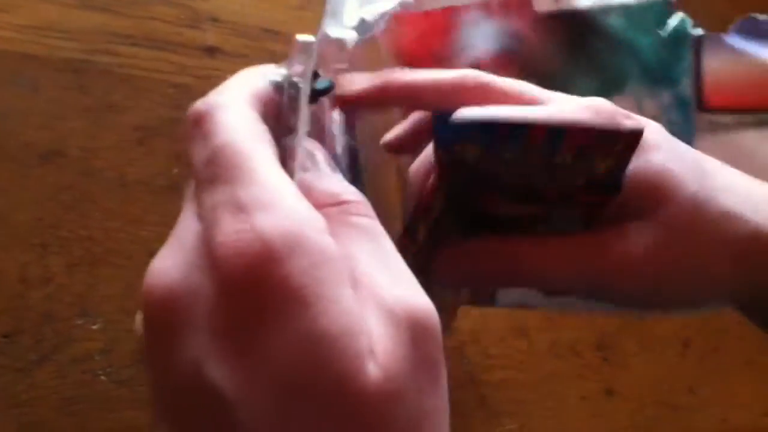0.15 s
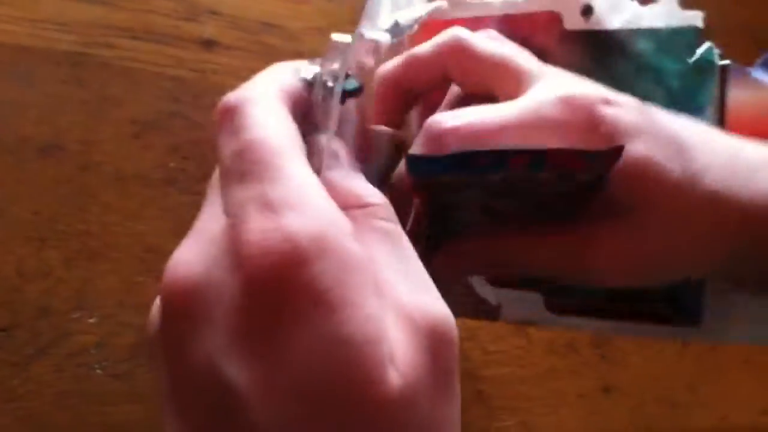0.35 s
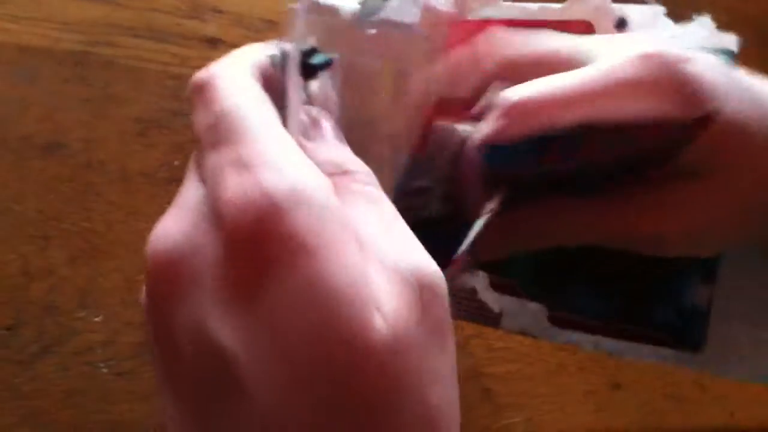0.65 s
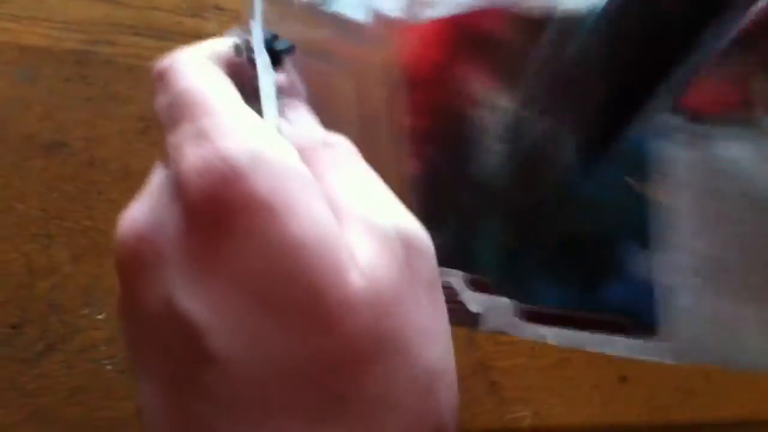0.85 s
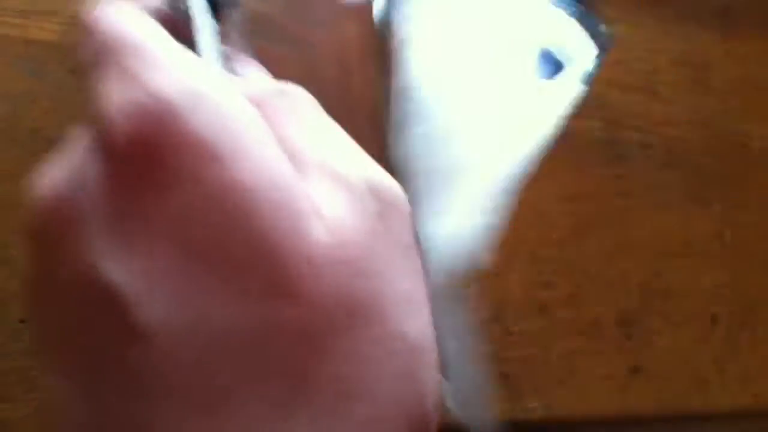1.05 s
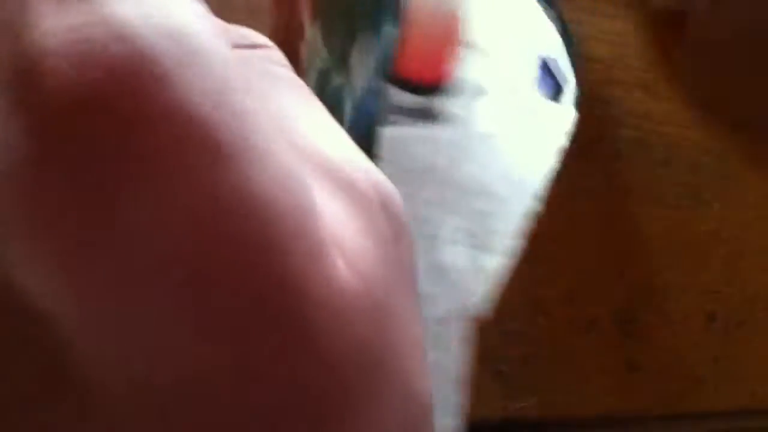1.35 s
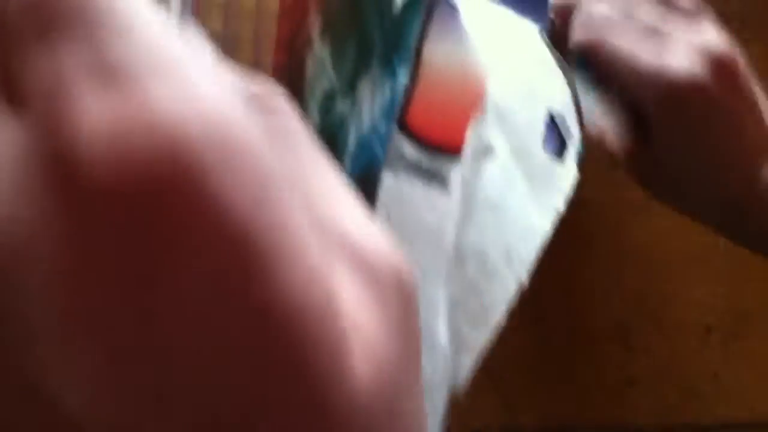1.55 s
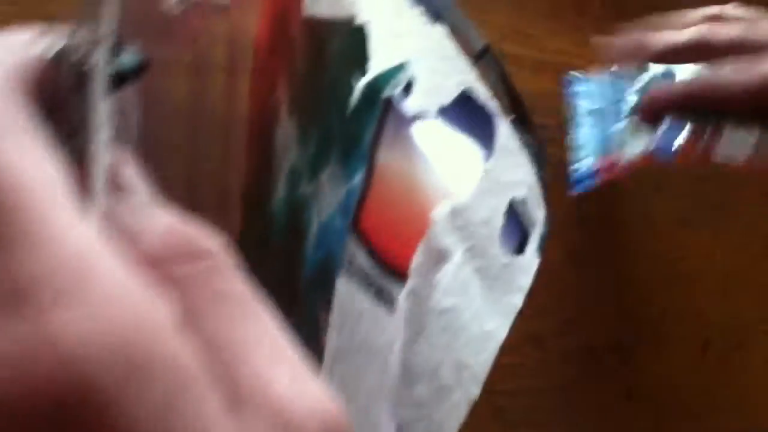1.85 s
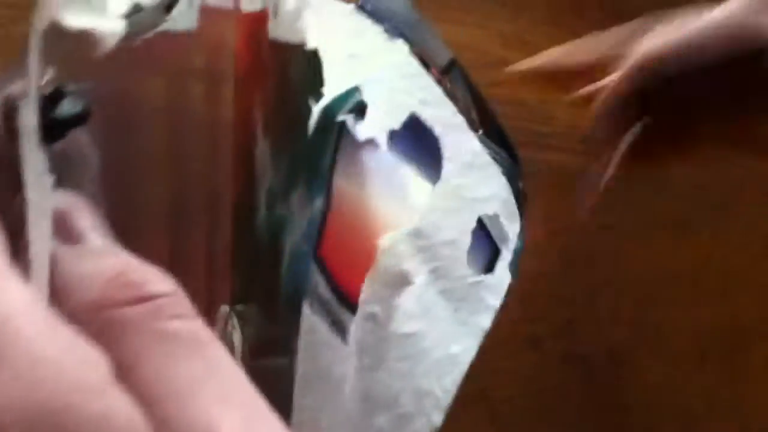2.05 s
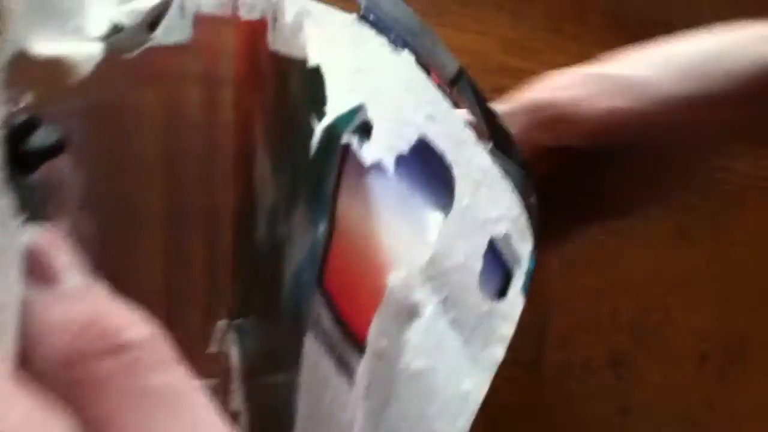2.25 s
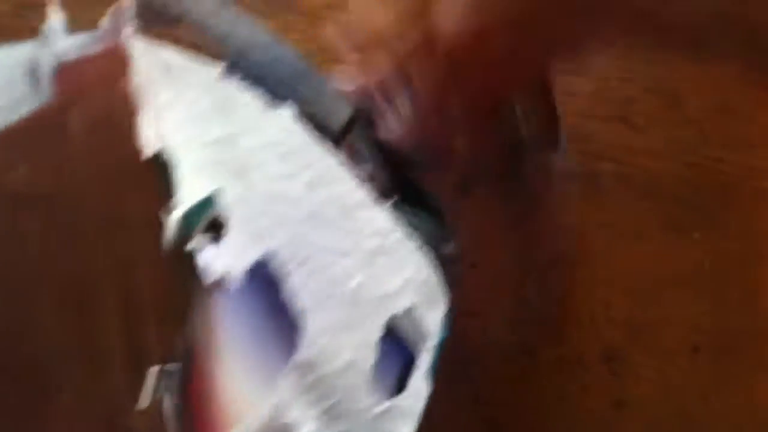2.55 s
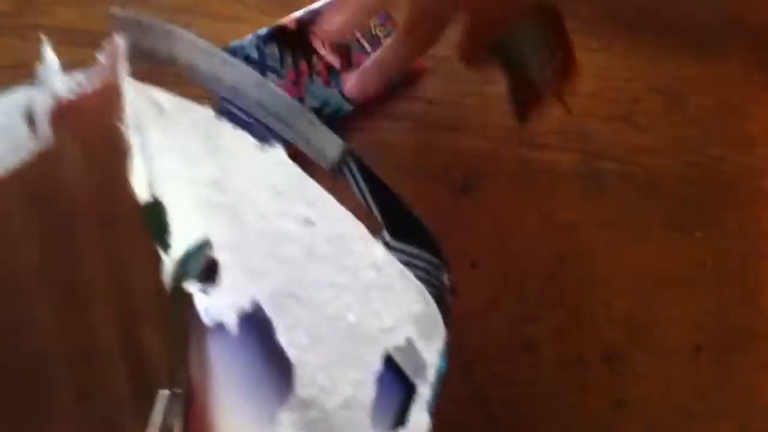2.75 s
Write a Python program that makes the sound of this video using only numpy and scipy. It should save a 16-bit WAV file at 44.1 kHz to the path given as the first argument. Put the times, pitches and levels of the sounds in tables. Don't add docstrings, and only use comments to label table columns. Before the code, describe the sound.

Stiff plastic packaging crackles and snaps sharply as hands peel it from card, then lighter foil packets rustle and scrape, one dropping with a soft thud on a wooden table; small room, close microphone.

```python
import sys
import numpy as np
from scipy import signal
from scipy.fft import rfft, irfft, next_fast_len
from scipy.io import wavfile
from scipy.ndimage import uniform_filter1d, map_coordinates

SR = 44100
rng = np.random.default_rng(int(sys.argv[2]) if len(sys.argv) > 2 else 0)


def how_loud(loudness_db):
    steps = np.asarray(loudness_db, float) / 20
    return 10 ** steps


def transcribe(signal):
    frames = np.atleast_2d(signal).T
    limited = np.clip(frames, -1, 1)
    pcm = np.round(limited * 32767).astype(np.int16)
    wavfile.write(sys.argv[1], SR, pcm)


N = 127890


def unit(x):
    return x / np.sqrt(np.mean(x ** 2) + 1e-20)


def along(points, hz):
    point_hz, value = np.transpose(points)
    return np.interp(np.log(hz + 1), np.log(point_hz + 1), value)


def wobble(rate):
    knots = rng.standard_normal(int(N * rate / SR) + 4)
    return map_coordinates(knots, [np.arange(N) * rate / SR])


def filtered(x, response):
    m = next_fast_len(N + SR // 2)
    return irfft(rfft(x, m) * response(np.fft.rfftfreq(m, 1 / SR)), m)[:N]


def add(out, s, sound):
    part = out[round(s * SR):][:len(sound)]
    part += sound[:len(part)]


def burst(hz, spread, t60, rise_s, t):
    f = np.fft.rfftfreq(len(t), 1 / SR) + 1
    band = (1 + (np.log(f / hz) / spread) ** 2) ** 1.08
    noise = irfft(rfft(rng.standard_normal(len(t))) / band, len(t))
    noise = noise * how_loud(-60 * t / t60) * (1 - np.exp(-t / rise_s))
    return noise / np.linalg.norm(noise) * np.sqrt(SR / 1000)


def snaps():
    # start_s, level_db, pitch_hz, card_db (card body over bright part)
    peel = [(0.0436, -39, 5200, 61), (0.062, -32, 5570, -26.5), (0.1023, -29.5, 7500, -19),
            (0.164, -47, 5400, 22), (0.1747, -27, 4540, -32), (0.1858, -29.5, 5100, 1),
            (0.2077, -16.5, 5200, -12), (0.2141, -18, 5440, -14), (0.2242, -12.5, 7700, -13),
            (0.2275, -5.5, 9250, -14.5), (0.2703, -34, 5900, 19), (0.3103, -18.5, 4840, -30),
            (0.3159, -10.5, 6400, -18.5), (0.325, -35, 6000, -26), (0.328, -28, 5700, -17),
            (0.3339, -24.5, 6100, -38), (0.369, -21.5, 6440, -8.5), (0.3954, -23, 6900, -16),
            (0.4021, -10.5, 7700, -12), (0.421, -22.5, 4850, -25), (0.4263, -24.5, 7160, -36),
            (0.4542, -23.5, 5700, -11), (0.4828, -31, 7900, -12), (0.508, -34, 7700, 4),
            (0.5496, -28, 6600, 0)]
    # start_s, level_db, pitch_hz, card_db
    pull = [(0.5782, -15, 7060, -11), (0.6024, -23, 7400, -22), (0.6151, -33, 4700, 14),
            (0.6645, -19, 7400, -6.5), (0.6726, -21.5, 6960, -7), (0.704, -16.5, 5400, -6.5),
            (0.722, -16, 8650, -18), (0.7318, -28, 6400, -19), (0.766, -28.5, 6300, 2),
            (0.7779, -15.5, 8000, -15.5), (0.8747, -26.5, 4300, 3), (0.8814, -25, 4000, 5),
            (0.8924, -15.5, 6200, -7), (0.8966, -16, 7340, -20), (0.9296, -14, 7700, -43),
            (0.94, -47, 6300, 5), (1.0438, -39.5, 6500, 7), (1.0856, -28, 6100, -12),
            (1.101, -38, 7000, -18), (1.1032, -9, 6670, -18.5), (1.106, -11.5, 6200, -18),
            (1.1176, -23, 7500, 6), (1.1911, -27, 7550, -13), (1.4233, -39.5, 8860, -31)]
    # start_s, level_db, pitch_hz, card_db
    packets = [(1.451, -22.5, 4100, 4), (1.491, -38, 5470, -15), (1.5096, -22.5, 4000, -1),
               (1.545, -29, 3300, -19), (1.5605, -22.5, 3400, -6), (1.5892, -29, 3400, -10),
               (1.5771, -12, 8900, -38), (1.6508, -14, 9100, -20), (1.663, -18.5, 6700, -4),
               (1.756, -30.5, 6000, -12), (1.7652, -44, 5900, -33), (1.776, -26.5, 6100, -16),
               (1.792, -24.5, 7060, -13), (1.8062, -16, 6350, -4), (1.8169, -17, 5550, 18),
               (1.9861, -33.5, 6900, -9.5), (2.0693, -25, 7440, -32), (2.1886, -34, 7600, -1),
               (2.2442, -34, 5100, -25), (2.2874, -28, 6100, -8.5), (2.4395, -26, 8300, -8),
               (2.514, -31, 6000, -24), (2.4977, -16.5, 5900, -25), (2.5553, -26, 6400, -24),
               (2.556, -20, 6650, -27), (2.563, -30, 6040, -1), (2.593, -21.5, 6850, -6),
               (2.7563, -31.5, 7700, -15.5), (2.8742, -59, 7600, -19), (2.879, -30.5, 7300, -46)]
    spread, rise_s, snap_t60 = 0.38, 0.00016, 0.0048
    body_hz, body_spread, body_t60, ring_t60 = 2300, 0.42, 0.022, 0.026
    trail_t60, trail_db = 0.078, -15.5
    spring_back_s, spring_back_db = 0.0026, -9
    top_hz = 13500
    out, t = np.zeros(N), np.arange(4096) / SR

    def crack(hz, card_db, bright_t60, card_t60):
        bright = burst(hz, spread, bright_t60, rise_s, t)
        return bright + how_loud(card_db) * burst(body_hz, body_spread, card_t60, rise_s, t)

    for s, db, hz, card_db in peel + pull + packets:
        share = how_loud(db) / np.hypot(1, how_loud(card_db))
        snap = crack(hz, card_db, snap_t60, body_t60)
        trail = how_loud(trail_db) * crack(hz, card_db, trail_t60, trail_t60)
        add(out, s, share * (snap + trail))
        ring_hz = body_hz * np.exp(0.11 * rng.standard_normal())
        ring = np.sin(2 * np.pi * ring_hz * t) * how_loud(card_db - 8.0 - 60 * t / ring_t60)
        add(out, s, share * ring)
        back = how_loud(spring_back_db + 1 * rng.standard_normal())
        add(out, s + spring_back_s, share * back * crack(hz, card_db, snap_t60, body_t60))
    return filtered(out, lambda f: (1j * f / (300 + 1j * f)) ** 2 / (1 + 1j * f / top_hz) ** 2)


def body(peaks):
    return lambda f: sum((-1) ** k * how_loud(db) * 1j * f * width / (hz * hz - f * f + 1j * f * width)
                         for k, (hz, width, db) in enumerate(peaks))


def crinkle(rate, size_db, life_s, hiss):
    sizes = how_loud(size_db * np.minimum(rng.exponential(size=N), 2.5))
    slips = (rng.random(N) < rate / SR * how_loud(3 * wobble(60))) * sizes
    puffs = signal.fftconvolve(slips, np.exp(-np.arange(400) / SR / life_s))[:N]
    return (unit(puffs) + hiss) * rng.standard_normal(N)


def patchy(x, depth_db):
    z = signal.stft(x, nperseg=256)[2]
    field = uniform_filter1d(rng.standard_normal(z.shape), size=7, axis=0)
    field = uniform_filter1d(field, size=24, axis=1)
    return unit(signal.istft(z * how_loud(depth_db * unit(field)), nperseg=256)[1][:N])


def rustle():
    # start_s, peak_s, end_s, level_db, card_db (card body over bright part)
    strokes = [(-.4, 0.09, .22, -47, -4.5), (0.155, 0.173, .2, -43, 5), (0.377, 0.403, .56, -43.5, -4),
               (0.48, 0.611, .68, -45.5, -1.5), (0.622, 0.727, .84, -44.5, 0.5),
               (0.791, 0.895, .97, -35.5, -5.5), (1.039, 1.04, 1.16, -46.5, -8),
               (1.109, 1.111, 1.2, -43.5, -7), (1.45, 1.451, 1.51, -42.5, -3),
               (1.491, 1.506, 1.75, -41.5, 3), (1.5, 1.596, 1.74, -35.5, -7.5),
               (1.635, 1.812, 2.0, -37, -10), (2.181, 2.182, 2.3, -51.5, 0),
               (2.269, 2.284, 2.5, -41, -11.5), (2.284, 2.456, 2.66, -32, -13.5),
               (2.436, 2.587, 2.72, -36, -17), (2.4, 2.74, 2.78, -52, -4), (2.855, 2.879, 3.1, -42.5, -7.5)]
    # pitch_hz, width_hz, level_db
    foil_peaks = [(4040, 960, -5.5), (5890, 1670, 3.5), (9040, 2870, 3), (14000, 10200, -10)]
    # pitch_hz, width_hz, level_db
    card_peaks = [(910, 670, -3), (2020, 860, 4), (3250, 1200, 2)]
    foot_db, flank_power = 24, 1.424
    t, bright, low = np.arange(N) / SR, np.zeros(N), np.zeros(N)
    for start, peak, end, db, card_db in strokes:
        away = np.where(t < peak, (peak - t) / (peak - start), (t - peak) / (end - peak))
        fade = np.clip(4 * (1.25 - away), 0, 1)
        stroke = how_loud(db - foot_db * away ** flank_power) * fade
        bright += stroke
        low += stroke * how_loud(card_db)
    shared = crinkle(1700, size_db=1.0, life_s=0.0016, hiss=0.92)
    foil = patchy(filtered(shared, body(foil_peaks)), depth_db=3.0)
    card_slips = shared + 1.17 * crinkle(350, size_db=4.0, life_s=0.0011, hiss=1.0)
    card = patchy(filtered(card_slips, body(card_peaks)), depth_db=4)
    return bright * foil + low * card


def scrapes():
    # start_s, end_s, level_db, pitch_hz
    strips = [(.36, 0.517, -52, 900), (0.756, 0.97, -53.5, 790), (.86, 0.899, -35.5, 2980),
              (0.875, 0.91, -27, 7900), (0.889, 0.911, -36, 1610), (1.04, 1.075, -54, 9500),
              (1.074, 1.082, -40.5, 2180), (1.527, 1.602, -36, 3380), (1.593, 1.626, -41, 1800),
              (1.593, 1.635, -42, 6540), (1.738, 1.806, -41.5, 6000), (2.28, 2.298, -37, 7500),
              (2.287, 2.37, -53, 6700), (2.369, 2.454, -47, 2100), (2.387, 2.502, -34.5, 9700),
              (2.456, 2.54, -29, 6040), (2.549, 2.772, -51, 2570), (2.597, 2.781, -45, 6100),
              (.164, 0.168, -39, 5500), (.2095, 0.2095, -30.5, 5540), (.2245, .227, -27, 6500),
              (0.466, 0.469, -33, 9000), (1.684, 1.76, -48, 3100), (2.561, 2.574, -24.5, 6000),
              (2.59, 2.597, -26.5, 7000), (2.636, 2.644, -35, 5500), (0.621, 0.622, -37, 7500),
              (.626, .629, -37, 10000), (.633, 0.638, -37, 6000), (0.651, 0.652, -38, 8500),
              (0.713, 0.713, -29, 5500), (.761, .771, -32, 4000), (2.209, 2.215, -45, 2400),
              (.17, 0.178, -33, 4050)]
    # time_s, pitch_hz, level_db
    squeak = [
        (1.042, 5000, -56),
        (1.045, 5870, -39),
        (1.054, 9200, -45),
        (1.059, 9740, -36),
        (1.062, 10130, -30),
        (1.068, 10200, -62),
    ]
    spread, lean, grain_db, squeak_rough = 0.21, 1.1, 3.5, 0.54
    out, grain = np.zeros(N), how_loud(grain_db * wobble(350))
    for start, end, db, hz in strips:
        u = np.linspace(0, 1, round((end - start) * SR))
        noise = filtered(rng.standard_normal(8192 * 2),
                         lambda f: 1 / (1 + (np.log((f + 1) / hz) / spread) ** 2))
        swell = np.sin(np.pi * u ** lean) ** 2
        add(out, start, how_loud(db) * unit(noise[:len(u)]) * swell)
    s, hz, db = np.transpose(squeak)
    t = np.arange(s[0], s[-1], 1 / SR)
    phase = 2 * np.pi * np.cumsum(np.interp(t, s, hz)) / SR
    phase += squeak_rough * wobble(1515)[:len(t)]
    add(out, s[0], how_loud(np.interp(t, s, db)) * np.sin(phase))
    return out * grain / np.sqrt(np.mean(grain ** 2))


def rings():
    # start_s, level_db, pitch_hz
    panels = [(0.0434, -26.5, 1990), (.1005, -34.5, 492), (0.404, -22, 1870), (.5075, -39, 485),
              (0.9409, -18.5, 1710), (.9455, -29.5, 600), (1.1164, -8, 2580), (1.12, -14.5, 2300),
              (1.5622, -12, 3120), (1.806, -10.5, 2360), (1.8175, -24, 2200)]
    cycles = 15
    out, t = np.zeros(N), np.arange(4096) / SR
    for s, db, hz in panels:
        decay = how_loud(db - 60 * t * hz / cycles)
        add(out, s, decay * np.sin(2 * np.pi * hz * t) * (1 - np.exp(-t * hz)))
    return out


def taps():
    # start_s, level_db, pitch_hz
    knocks = [(0.1008, -37.5, 783), (0.208, -42, 533), (0.2215, -40.5, 683), (0.271, -44, 756),
              (0.5067, -36.5, 507), (0.7232, -43.5, 820), (0.765, -41.5, 390), (0.894, -34, 318),
               (1.451, -47, 690), (1.617, -35.5, 983), (1.8169, -31.5, 216), (2.7014, -44.5, 302),
              (2.7413, -42, 330), (2.7633, -44, 336), (2.793, -43.5, 230), (2.8333, -43.5, 410),
              (2.8646, -42, 316)]
    # start_s, level_db, pitch_hz
    pushes = [
        (0.103, -39, 197),
        (.9, -42, 135),
        (0.954, -45.5, 113),
        (1.191, -47.5, 108),
        (2.296, -44.5, 910),
        (1.807, -34, 715),
    ]
    t60, spread, soft_hz = 0.026, 0.44, 450
    out, t = np.zeros(N), np.arange(4096) / SR
    for s, db, hz in knocks + pushes:
        tone = np.sin(2 * np.pi * hz * t)
        puff = burst(hz, spread, 2.16 * t60, 0.00056, t)
        mode = how_loud(-60 * t / t60) * tone * (1 - np.exp(-t / 0.00053))
        swing = tone * np.exp(-(1.48 * (hz * t - 1.25)) ** 2)
        add(out, s, how_loud(db + 4.0) * (swing if hz < soft_hz else mode + 1.53 * puff))
    return out


def table():
    # start_s, level_db
    thuds = [
        (1.818, -31),
    ]
    # pitch_hz, level_db, t60_s
    modes = [(121.8, -8, 0.51), (237, -7, 0.15), (397, -2.5, 0.064)]
    out, t = np.zeros(N), np.arange(SR // 3) / SR
    for s, db in thuds:
        boom = np.zeros(len(t))
        for (hz, level, t60), vary_db in zip(modes, rng.standard_normal(len(modes))):
            boom += how_loud(db + level + vary_db - 60 * t / t60) * np.sin(2 * np.pi * hz * t)
        add(out, s, boom * (1 - np.exp(-(t / 0.0011) ** 2)))
    return out


def room(x, size=8192):
    # pitch_hz, t60_s
    decay = [(200, 0.41), (6000, 0.22), (14000, 0.069)]
    delay_s = 0.004
    out = np.zeros(N)
    for k in range(0, N, size):
        hz, t, z = signal.stft(rng.standard_normal(SR // 2), SR, nperseg=256)
        dying = z * how_loud(-60 * t / along(decay, hz)[:, None])
        tail = signal.istft(dying, SR, nperseg=256)[1]
        add(out, k / SR + delay_s, signal.fftconvolve(x[k:k + size], tail / np.linalg.norm(tail)))
    return out


def floor():
    # pitch_hz, level_db (per Hz)
    spectrum = [(20, -13), (125, 0), (240, -1), (500, -9), (1200, -19), (16000, -22.5)]
    noise = unit(filtered(rng.standard_normal(N), lambda hz: how_loud(along(spectrum, hz))))
    return how_loud(-55.5 + 0.17 * wobble(9.2)) * noise


def scene():
    near = snaps() + rustle() + taps() + table() + scrapes() + rings()
    room_db = -13
    return (near + how_loud(room_db) * room(near) + floor())[None]


def band_limit(x):
    return signal.sosfilt(signal.butter(12, 16680, fs=SR, output="sos"), x)


def record(dry):
    # pitch_hz, level_db
    mic = [(11000, -1.5), (15500, -7.5), (16400, -34)]
    mix = filtered(dry[0], lambda hz: how_loud(along(mic, hz)))[None]
    return band_limit(mix)


dry = scene()
out = record(dry)
transcribe(out)
```